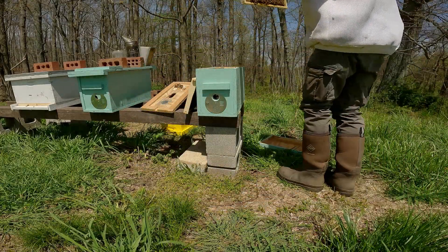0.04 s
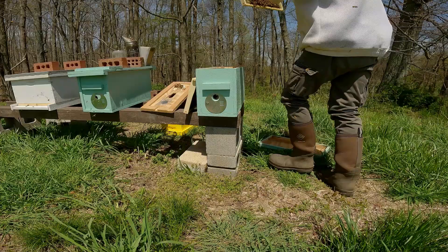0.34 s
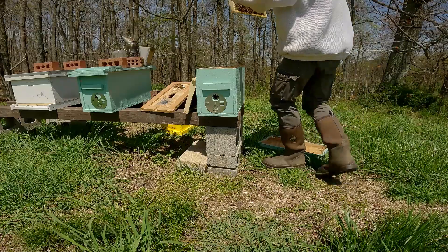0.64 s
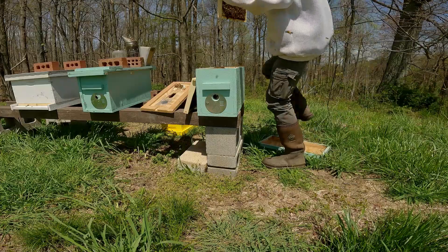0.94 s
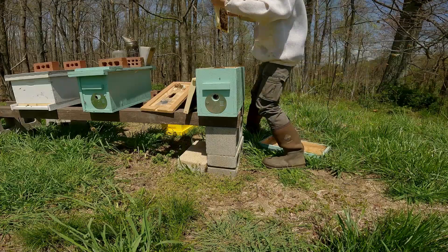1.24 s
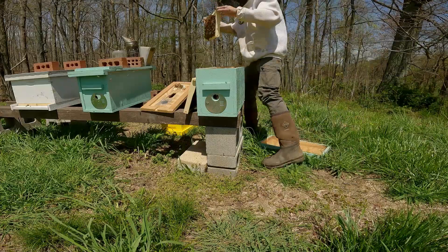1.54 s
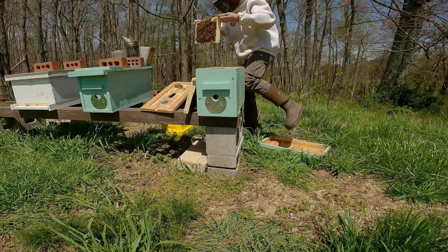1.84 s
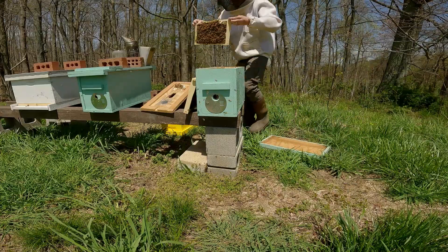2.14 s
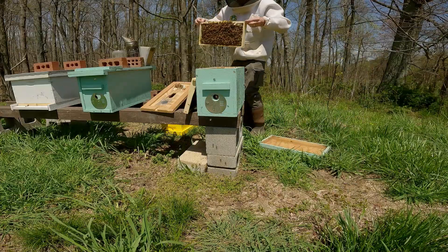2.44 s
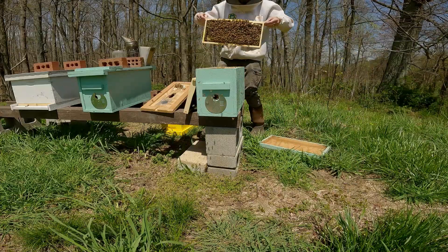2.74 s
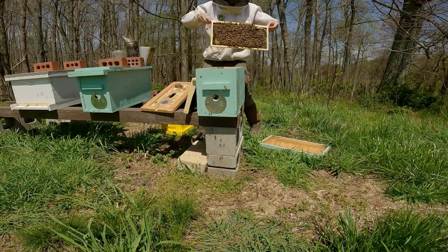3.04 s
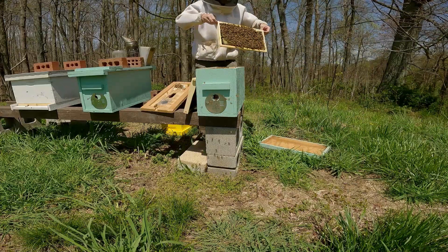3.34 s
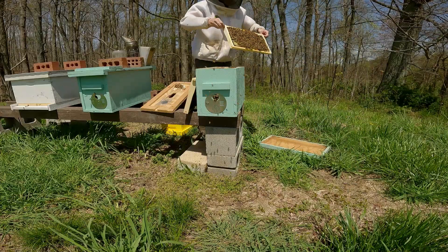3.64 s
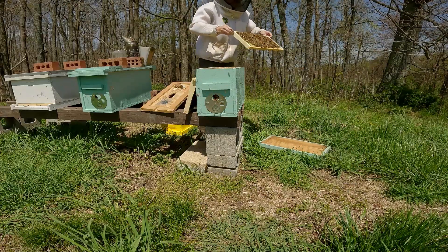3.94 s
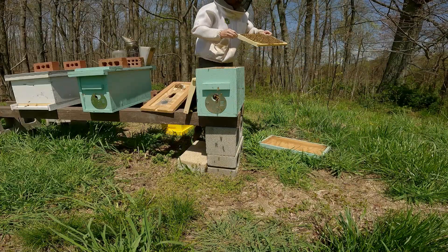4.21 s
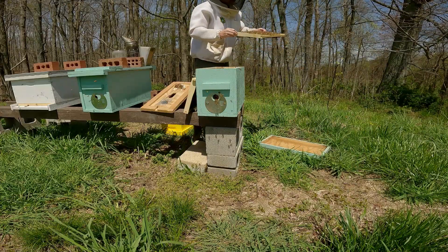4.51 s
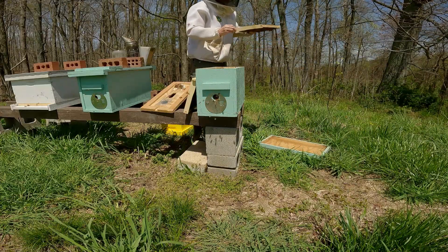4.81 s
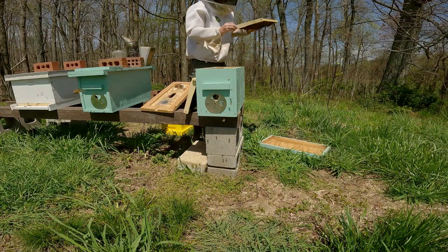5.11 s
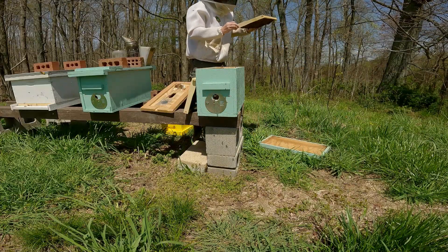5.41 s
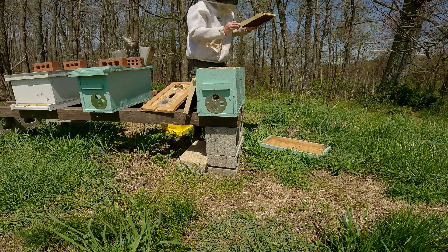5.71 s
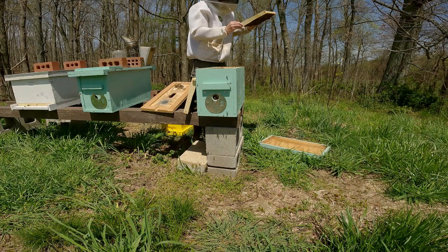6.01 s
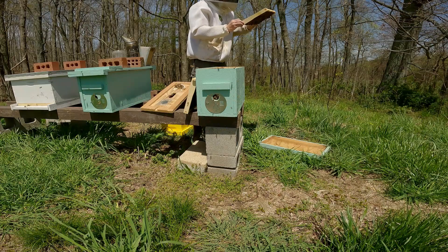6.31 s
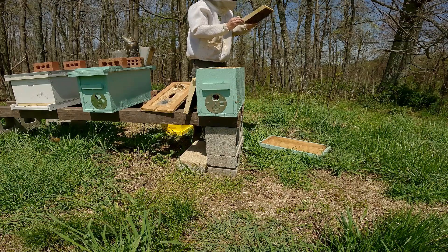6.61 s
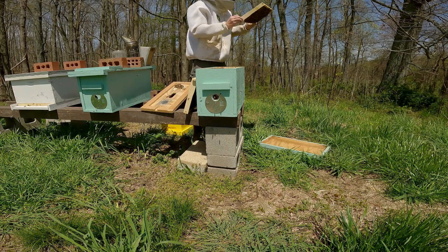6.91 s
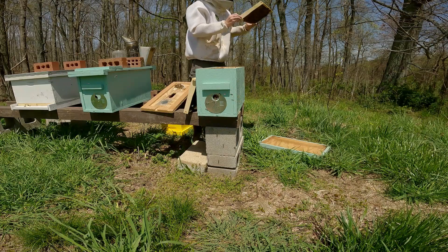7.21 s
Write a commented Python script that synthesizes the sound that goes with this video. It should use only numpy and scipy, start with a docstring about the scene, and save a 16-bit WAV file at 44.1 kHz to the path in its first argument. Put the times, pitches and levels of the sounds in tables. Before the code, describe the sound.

Gusty wind thumps and rumbles on the microphone over a low hum of honeybees and a few faint footsteps in dry grass.

```python
"""Grassy woodland edge, by the hives. Honeybee wingbeats merge into a hum; single bees pass closer.
A beekeeper steps through dry grass: swishes, crunches, snapping stems, one scuff.
Wind on a small two-port microphone: rumble, turbulent bursts, crackle, single slapping eddies.
Soft tree hiss behind the swarm."""
import sys
import numpy as np
from scipy import signal
from scipy.fft import rfft, irfft
from scipy.io import wavfile
from scipy.ndimage import uniform_filter1d, map_coordinates

SR = 44100
rng = np.random.default_rng(int(sys.argv[2]) if len(sys.argv) > 2 else 0)


def dump_mix(stems):
    """Bounce the given channels to the path in sys.argv[1] as a 16-bit WAV at rate SR."""
    frames = np.atleast_2d(stems).T  # one column per channel
    limited = np.clip(frames, -1, 1)  # hard clip at full scale
    pcm = np.round(limited * 32767).astype(np.int16)
    wavfile.write(sys.argv[1], SR, pcm)


N = 324135
T = np.arange(N) / SR
FREQS_HZ = np.maximum(np.fft.rfftfreq(N, 1 / SR), 1)

# Levels are relative, ahead of each source's gain.
# swarm nearness (time [s], level [dB])
SWARM_NEARNESS = [(0, -57.5), (1.45, -60), (1.9, -61.5), (2.8, -58), (3.25, -60), (3.65, -58), (4.05, -58),
                  (4.5, -57.5), (5.0, -57.5), (5.6, -59.7), (6.2, -58.5), (6.75, -59), (7.05, -57.5),
                  (7.35, -58)]
# breeze between gusts (time [s], level [dB])
BREEZE = [(0, -46), (.3, -38), (.55, -32.5), (1.0, -36), (1.55, -32), (2.05, -36), (2.48, -41),
          (2.9, -30.5), (3.17, -32), (3.26, -42), (3.65, -42.5), (4.15, -39), (4.4, -37), (4.53, -28.5),
          (4.75, -36), (5.05, -43), (5.15, -31), (5.42, -34.5), (5.68, -32.5), (5.98, -41), (6.08, -35.5),
          (6.5, -41), (7.35, -39.5)]
# gusts at the microphone (arrival [s], hold [s], level [dB])
GUSTS = [(0.27, 1, -42), (0.415, .13, -32), (0.596, 0.021, -31), (0.686, 0.12, -31), (0.833, 0.079, -34),
         (0.989, 0.023, -32), (1.102, 0.028, -25), (1.139, 0.032, -31.5), (1.274, 0.45, -30),
         (1.366, 0.0479, -27.5), (1.454, .1, -24), (1.569, 0.0505, -26), (1.65, .07, -29),
         (1.752, 0.073, -23.5), (1.831, 0.071, -33), (2.097, 0.021, -39), (2.278, 0.036, -43.5),
         (2.65, 0.011, -32.5), (2.68, .39, -37.5), (2.721, 0.0243, -30.5), (2.77, 0.034, -30),
         (2.815, 0.033, -26.5), (2.883, 0.066, -25.5), (2.986, 0.021, -33.5), (3.04, 0.022, -35),
         (3.09, .11, -46), (5.153, 0.51, -52), (5.37, 0.0071, -36.5), (5.449, 0.017, -39)]
# boots and cloth brushing grass (centre [s], width [s], level [dB])
SWISHES = [(0.01, 0.055, -60), (0.276, 0.3, -61.5), (0.53, 0.09, -68), (0.625, 0.1, -61.5),
           (0.8, 0.11, -62), (1.15, .17, -70), (1.434, 0.1, -64), (1.71, 0.14, -64.5),
           (1.911, 0.031, -58.5), (2.416, 0.0693, -59.5), (2.582, 0.15, -68), (3.348, 0.19, -60.5),
           (3.553, 0.13, -64), (4.439, 0.54, -68)]
# boots crushing dry tufts (time [s], decay [s], level [dB])
CRUNCHES = [(0.016, .006, -57), (0.145, 0.025, -53), (0.606, 0.026, -49.5), (0.702, 0.0084, -57),
            (0.803, .01, -59.5)]
# dry stems snapping (time [s], level [dB], ring [Hz])
SNAPS = [(0.026, -49.5, 7000), (0.225, -48, 5600), (0.2513, -46, 5820), (0.272, -52, 6800),
         (0.299, -52, 7500), (0.355, -50, 5020), (0.4229, -51, 4790), (0.646, -51, 5400),
         (0.711, -52, 3800), (0.8235, -50, 4960), (1.222, -45, 11500), (1.6652, -58.5, 3910),
         (2.5361, -53, 5380), (3.1932, -53, 3600), (3.5742, -56, 4650), (6.303, -45.5, 5030)]
# close bees (centre [s], half-width [s], wingbeat [Hz], glide [Hz/s], level [dB], emphasis [Hz])
FLYBYS = [(3.7, .16, 244, -60, -55, 1250), (3.84, .09, 238, 10, -51.5, 240),
          (4.3, .19, 243, -25, -53.5, 1220), (7.05, .1, 241, 70, -50.5, 490),
          (0.085, 0.42, 245.6, -8, -67, 1230), (4.48, .1, 251, 15, -58, 1760),
          (4.95, .11, 220, -120, -57, 440), (6.08, .1, 222, 90, -59, 430), (6.55, .09, 244, 90, -60, 1220),
          (7.05, .08, 236, 90, -55, 1650), (7.04, .08, 222, -100, -59, 1150), (4.15, .2, 218, 20, -57, 430)]
# eddies slapping the port (time [s], level [dB], swing [Hz])
EDDIES = [(0.38, -20, 160), (0.419, -23, 170), (0.449, -20.5, 190), (0.477, -20.5, 200), (0.512, -15, 205),
          (0.5392, -16.5, 181), (0.589, -15.5, 292), (0.61, -10, 95), (0.6846, -18, 188),
          (0.709, -20.5, 190), (0.773, -23, 180), (0.817, -24.5, 161), (1.006, -23.5, 190),
          (1.095, -13, 205), (1.1054, -14.5, 285), (1.116, -19.5, 395), (1.1766, -18, 240),
          (1.2407, -11.5, 260), (1.333, -22, 310), (1.3593, -14.5, 255), (1.401, -18, 335),
          (1.4417, -12.5, 160), (1.4706, -12.5, 285), (1.493, -12, 161), (1.519, -14, 335),
          (1.5488, -24.5, 395), (1.5676, -12.5, 334), (1.593, -14, 383), (1.653, -21, 335),
          (1.671, -24, 550), (1.694, -17.5, 284.9), (1.7334, -14, 225), (1.751, -18.5, 285),
          (1.773, -17.5, 480), (1.8053, -11.5, 296), (1.87, -16, 483), (2.1, -28, 120), (2.655, -24.5, 150),
          (2.731, -21.5, 262), (2.7683, -17, 320), (2.817, -22, 265), (2.8985, -20.5, 235),
          (2.9198, -15, 283), (5.3698, -17, 150), (5.457, -15, 74.65), (5.468, -17, 92)]

# source spectra (frequency [Hz], gain [dB])
SWARM_EQ = [(120, 19.5), (235, 4.5), (330, -1.5), (420, 4.5), (510, 1.5), (640, -6.5), (860, -12.5),
            (960, 2), (1120, 1), (1250, 2), (1500, -2.5), (1760, -4.5), (2000, -9), (2400, -5),
            (3100, -14.5), (10000, -53)]
TREE_EQ = [(40, 14), (150, 11.5), (330, 3), (700, -2), (1400, -2), (2400, -3), (3300, -17.5), (5200, -17),
           (7300, -21.5), (8400, -30), (9800, -30.5), (10600, -35.5), (11700, -29), (13000, -42.5)]
RUMBLE_EQ = [(8, -34), (22, -0.5), (42, -0.5), (75, -5), (110, -13.5), (180, -36), (400, -73),
             (1000, -86.5)]
GRASS_EQ = [(300, 4), (1500, 9.5), (3200, 2.5), (5000, 3.5), (7200, -1.5), (8500, -10.5), (12000, -15),
            (14000, -25.5)]
FLYBY_EQ = [(250, 2), (500, 0.5), (750, -9.5), (1000, -11), (1250, 1.5), (1500, -12.5), (1750, -2.5),
            (2400, -18), (3300, -21), (8000, -56)]
BUFFET_EQ = [(20, -28), (55, -1.5), (105, 7), (165, 3.5), (260, -4), (420, -13.5), (680, -25.5),
             (1000, -34.5), (1600, -44.5), (3000, -81)]
SPIT_EQ = [(150, -18), (400, -0.5), (750, 3.5), (1200, -4.5), (1800, -26.5), (3000, -57)]
STRAW_EQ = [(3000, -24), (6500, 1), (9500, -2), (12000, -6), (14000, -3)]
# port dulling sharp eddies (frequency [Hz], gain [dB])
PORT_EQ = [(350, 0.5), (800, -1), (1400, -1), (2200, -2.5), (3500, -11.5)]
# wind on the right, a pressure difference between ports (frequency [Hz], gain re left [dB])
WIND_RIGHT_EQ = [(105, -35), (140, 1), (260, 5.5), (450, 6), (860, 5), (950, 0), (3000, -2)]
# port pair, distant sound (frequency [Hz], right lead [rad], left minus right [dB], likeness [0-1])
PORT_PAIR = [(59.5, 0.46, -8, 1), (246, 0.21, 0.2, 1), (1190, 0, 0, 0.82), (2280, 1.08, 1.5, 0.67),
             (2930, 1.6, -2, 0), (3500, 1.4, -7, 1), (3880, .1, -5, 0.6), (5080, 0.47, -3, 1),
             (7500, 0.46, .5, 0.98), (12000, 0.6, 1.5, .68)]


def undb(db):
    """Decibels to gain."""
    return 10 ** (np.asarray(db) / 20)


def unit(x):
    """Scale to rms 1."""
    return x / np.sqrt(np.mean(x ** 2))


def in_time(table):
    """A time curve at every sample."""
    times_s, values = np.transpose(table)
    return np.interp(T, times_s, values)


def in_pitch(table):
    """Each column of a spectrum at every FFT bin."""
    hz, *columns = np.transpose(table)
    return [np.interp(np.log(FREQS_HZ), np.log(hz), c) for c in columns]


def colour(x, eq):
    """Filter by (frequency [Hz], gain [dB]) points."""
    return irfft(rfft(x) * undb(in_pitch(eq)[0]), N)


def walk(rate_hz, t=T):
    """Random levels joined by lines; spread near 1."""
    levels = rng.standard_normal(8192)
    return np.sqrt(3 / 2) * np.interp(t * rate_hz + rng.random(), np.arange(len(levels)), levels)


def crackle(depth_db, rate_hz):
    """Two channels of noise with a flickering level."""
    return rng.standard_normal((2, N)) * undb(depth_db * walk(rate_hz))


def pops(shape, rate_hz, scatter_db):
    """Random impulses of uneven strength."""
    return (rng.random(shape) < rate_hz / SR) * undb(scatter_db * rng.standard_normal(shape))


def swept(eq, speed):
    """Frozen turbulence carried past the port at a varying relative speed."""
    pattern = colour(rng.standard_normal(N), eq)
    return map_coordinates(pattern, [np.cumsum(speed) % N], order=3, mode="wrap")


def wings(hz):
    """One sharp push of air per wing stroke."""
    stroke = unit(irfft(np.r_[0, np.ones(30), np.zeros(2018)]))  # 30 equal harmonics
    cycles = np.cumsum(hz) / SR
    return stroke[(cycles * len(stroke)).astype(int) % len(stroke)]


def swarm(count=28, wing_hz=238, spread=.06, swerve=.055, tremble=.011, pass_db=3, gain_db=8.5):
    """Each bee beats at its own wavering rate, swelling and fading as it circles the hives."""
    coarse_s = T[::64]
    hum = np.zeros((2, N))
    for k, offset in enumerate(np.linspace(-1, 1, count) * np.sqrt(3)):
        hz = wing_hz * (1 + spread * offset + swerve * walk(5, coarse_s) + tremble * walk(30, coarse_s))
        nearness = undb(pass_db * walk(3, coarse_s))
        hum[k % 2] += wings(np.interp(T, coarse_s, hz)) * np.interp(T, coarse_s, nearness)
    return unit(colour(hum, SWARM_EQ)) * undb(in_time(SWARM_NEARNESS) + gain_db)


def trees(level_db=-48.5, follow=.98):
    """Air hissing in the wood; level tracks the hum."""
    near_db = in_time(SWARM_NEARNESS)
    hiss = unit(colour(rng.standard_normal((2, N)), TREE_EQ))
    sway_db = .45 * walk(5)
    return hiss * undb(level_db + sway_db + follow * (near_db - near_db.mean()))


def gust_force(attack_s=.006, release_s=.013):
    """Gusts rise, hold and decay; overlaps add in power."""
    power = 1e-12
    for at_s, hold_s, level_db in GUSTS:
        fade = np.maximum(at_s - T, 0) / attack_s + np.maximum(T - at_s - hold_s, 0) / release_s
        power = power + (undb(level_db) * np.exp(-fade)) ** 2
    return np.sqrt(power)


def rumble(gain_db=3, pan_db=3, swell_s=.18, limit_db=-29, waver_db=2, quicken=.13, ref_db=-29):
    """Slow air rolling round each side: breeze plus the body of each gust, deeper when weak."""
    breeze = undb(in_time(BREEZE) + np.array([[pan_db], [-pan_db]]) / 2)
    swell = uniform_filter1d(gust_force(), int(swell_s * SR))
    exposure = undb([[6], [-18.5]])  # left side faces the gusts
    body = undb(limit_db) * np.tanh(swell / undb(limit_db)) * exposure
    force = np.hypot(breeze, body) * undb(waver_db * walk(15))
    rolls = np.array([swept(RUMBLE_EQ, (side / undb(ref_db)) ** quicken) for side in force])
    power = uniform_filter1d(uniform_filter1d(rolls ** 2, SR // 5), SR // 10)
    return undb(gain_db) * force * rolls / np.sqrt(power + 1e-18)


def swishes(gain_db=1.8, blades_db=-3):
    """Boots and cloth rub the grass; single blades flick back."""
    swell = sum(undb(level_db) * np.exp(-2 * ((T - at_s) / width_s) ** 2)
                for at_s, width_s, level_db in SWISHES)
    rubbing = unit(crackle(depth_db=3, rate_hz=300))
    blades = undb(blades_db) * unit(pops((2, N), rate_hz=450, scatter_db=4))
    return undb(gain_db) * swell * unit(colour(rubbing + blades, GRASS_EQ))


def crunches(attack_s=.0036):
    """A tuft collapses under the boot: a brief burst of crackle."""
    bursts = np.zeros(N)
    for at_s, decay_s, level_db in CRUNCHES:
        fade = np.maximum(at_s - T, 0) / attack_s + np.maximum(T - at_s, 0) / decay_s
        bursts += undb(level_db) * np.exp(-fade)
    return bursts * unit(colour(crackle(depth_db=4, rate_hz=900), GRASS_EQ))


def stem_snaps(decay_s=.00085, crack=.65):
    """A dry stem breaks: a crack with a very short ring."""
    out, t = np.zeros(N), T[:SR // 40]
    for at_s, level_db, ring_hz in SNAPS:
        snap = np.sin(2 * np.pi * ring_hz * t) + crack * rng.standard_normal(len(t))
        i = int(at_s * SR)
        out[i:i + len(t)] += undb(level_db) * np.exp(-t / decay_s) * snap
    return colour(out, GRASS_EQ)


def flybys(swerve=.024, tremble=.018, flutter_db=2.5, emphasis_db=8, emphasis_oct=.38):
    """A close bee glides and trembles; its heading favours one band of the buzz."""
    out = np.zeros(N)
    for at_s, width_s, wing_hz, glide_hz_per_s, level_db, emphasis_hz in FLYBYS:
        along = (T - at_s) / width_s
        hz = wing_hz + glide_hz_per_s * width_s * np.tanh(along)
        buzz = wings(hz * (1 + swerve * walk(16) + tremble * walk(70)))
        heading_db = emphasis_db * np.exp(-(np.log2(FREQS_HZ / emphasis_hz) / emphasis_oct) ** 2)
        buzz = irfft(rfft(buzz) * undb(in_pitch(FLYBY_EQ)[0] + heading_db), N)
        out += unit(buzz) * undb(level_db + flutter_db * walk(35)) * np.exp(-along ** 2)
    return out


def buffeting(gain_db=1.5, breeze_db=-20, surge_db=1.26, quicken=.19, ref_db=-25, flutter=.12):
    """Turbulence sweeps past the port; faster air gives quicker, stronger swings."""
    force = np.hypot(gust_force(), undb(in_time(BREEZE) + breeze_db))
    force_db = 20 * np.log10(force) + surge_db * walk(40)
    speed = undb(quicken * (force_db - ref_db)) * np.exp(flutter * walk(140))
    pressure = swept(BUFFET_EQ, speed) * speed ** .78
    # force sets the 150-800 Hz level over each 50 ms
    swings = colour(pressure, [(120, -60), (150, 0), (800, 0), (1000, -60)])
    power = uniform_filter1d(uniform_filter1d(swings ** 2, SR // 20), SR // 40)
    return undb(gain_db + force_db) * pressure / np.sqrt(power + 1e-18)


def spits(gain_db=-41, ref_db=-24, steepen=2.1):
    """The fastest air sheds tiny crackling eddies."""
    force = (gust_force() / undb(ref_db)) ** steepen
    return undb(gain_db) * force * unit(colour(pops(N, rate_hz=260, scatter_db=3), SPIT_EQ))


def eddies(gain_db=-4, delay_s=.0015):
    """Each eddy sucks at the port, then pushes: one pressure swing."""
    out, t = np.zeros(N), np.arange(-SR // 40, SR // 40) / SR
    for at_s, level_db, swing_hz in EDDIES:
        phase = 2 * np.pi * swing_hz * (t - delay_s)
        swing = 3 * phase / (1 + phase ** 2) ** 2
        i = int((at_s + t[0]) * SR)
        out[i:i + len(t)] += undb(level_db + gain_db) * swing
    return colour(out, PORT_EQ)


def scuff(at_s=.55, width_s=.062, level_db=-68):
    """A sole drags over dry straw: thin, bright sizzle."""
    sizzle = unit(colour(crackle(depth_db=4, rate_hz=800), STRAW_EQ))
    return undb(level_db) * np.exp(-((T - at_s) / width_s) ** 2) * sizzle


def wind():
    """Turbulence hits the left directly, the right a quarter cycle early; rumble is per side."""
    left = buffeting() + eddies() + spits()
    right = irfft(1j * rfft(left) * undb(in_pitch(WIND_RIGHT_EQ)[0]), N)
    return np.array([left, right]) + rumble()


def ports(field):
    """Two unrelated halves of a sound field become a partly alike stereo pair with lag and tilt."""
    lead_rad, pan_db, likeness = in_pitch(PORT_PAIR)
    mid, side = rfft(field) * np.sqrt([(1 + likeness) / 2, (1 - likeness) / 2])
    turn = undb(pan_db / 2) * np.exp(-.5j * lead_rad)
    return irfft(np.array([(mid + side) * turn, (mid - side) / turn]), N)


def scene():
    """Apiary through the ports; close bees and snaps centred; wind on top."""
    field = swarm() + trees() + swishes() + crunches() + scuff()
    return ports(field) + flybys() + stem_snaps() + wind()


def record(dry, fade_s=.006, cutoff_hz=13000):
    """Short fade at each end, then a steep low-pass."""
    fade = np.clip(np.minimum(T, T[-1] - T) / fade_s, 0, 1)
    lowpass = signal.ellip(8, .2, 70, cutoff_hz, fs=SR, output="sos")
    return signal.sosfilt(lowpass, dry * fade)


dry = scene()
out = record(dry)
dump_mix(out)
```